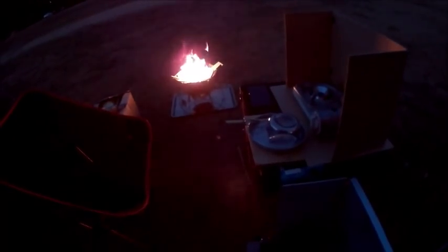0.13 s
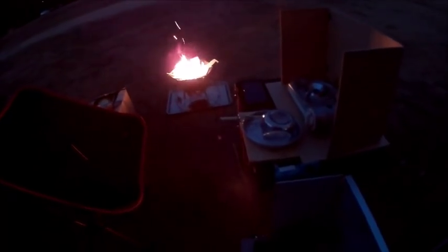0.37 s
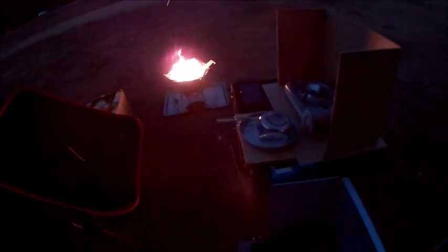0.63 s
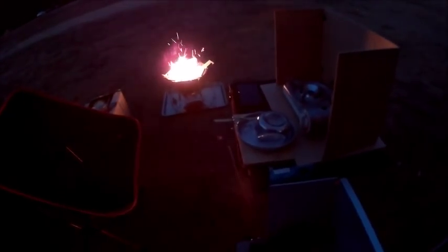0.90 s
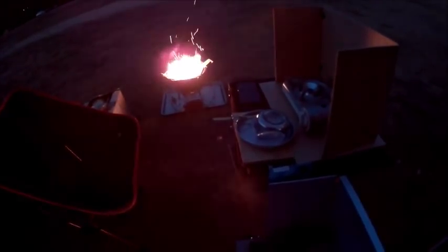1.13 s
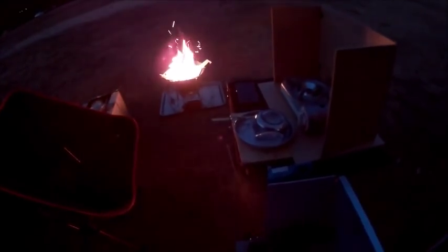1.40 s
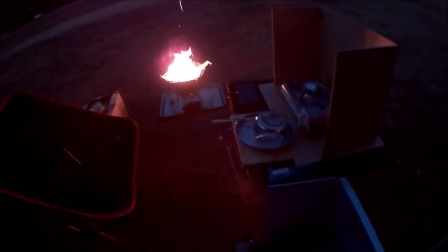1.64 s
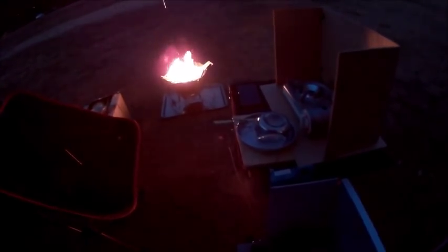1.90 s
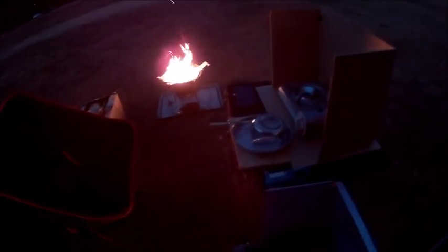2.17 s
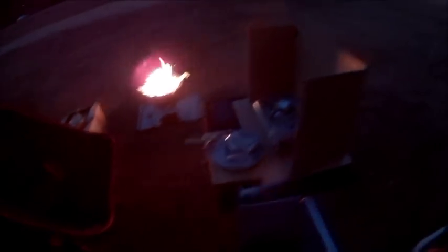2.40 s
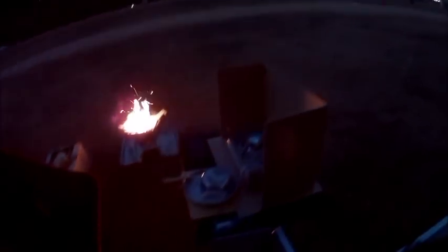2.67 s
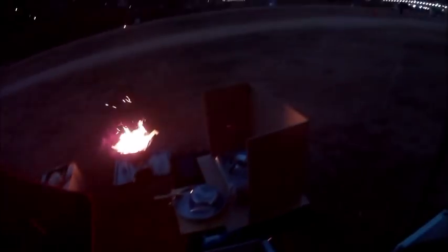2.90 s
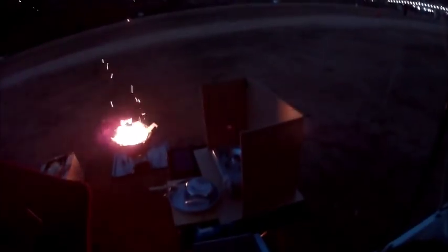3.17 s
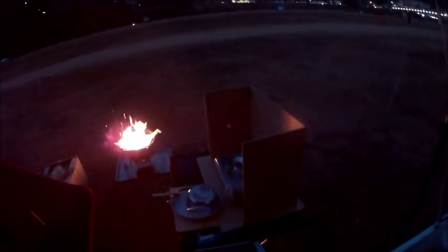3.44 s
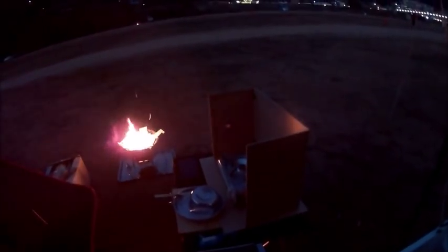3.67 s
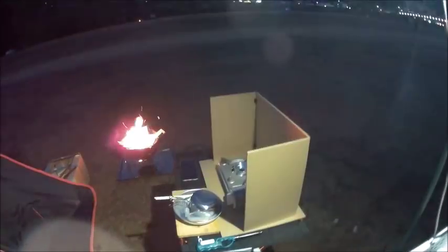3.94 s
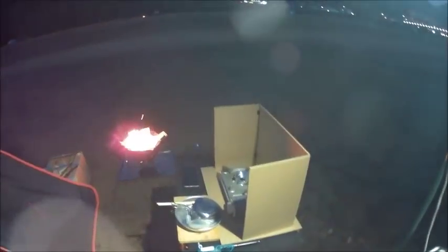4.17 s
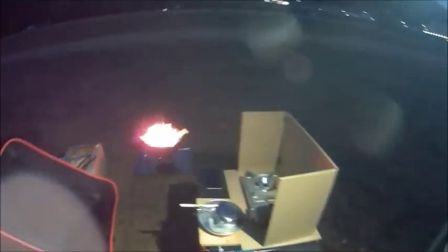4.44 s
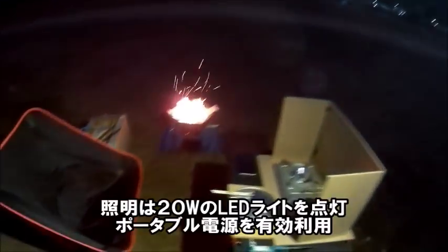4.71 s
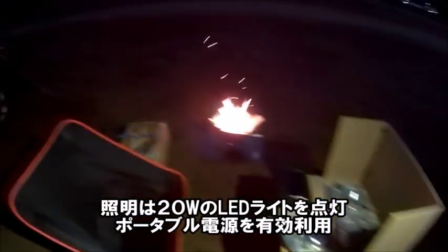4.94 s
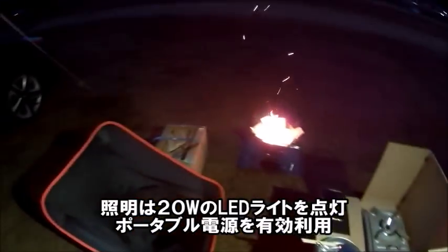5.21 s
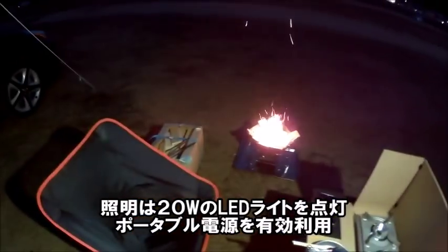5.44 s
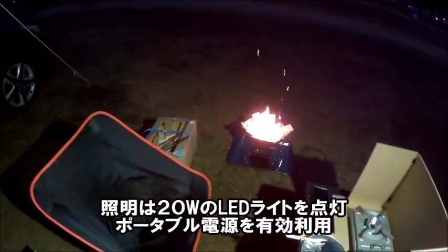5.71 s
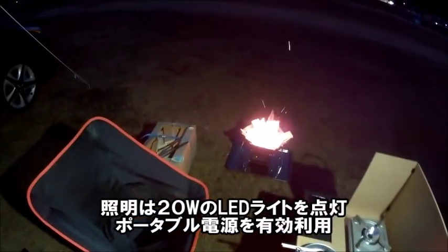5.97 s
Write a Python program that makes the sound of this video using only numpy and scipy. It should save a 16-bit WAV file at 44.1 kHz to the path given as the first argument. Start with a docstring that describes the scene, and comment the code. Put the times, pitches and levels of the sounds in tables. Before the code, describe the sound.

A small wood fire snaps and pops irregularly at night, sharp cracks echoing off nearby gear over a faint low flutter and quiet outdoor air.

```python
"""A night campsite with a small wood fire, a few steps from a hand-held camera.
Pockets of sap burst in the logs: each pop is a set of fast-dying tones, with a ring from the fire pan,
echoes off the gear nearby, a scattered tail of noise and an answer from a far wall.
Tiny crackles, soft puffs of noise, dull knocks and low thumps lie on shaped noise: the flames' rumble,
steam, the night air and microphone hiss. A distant machine hums on two low tones."""
import sys
import numpy as np
from scipy import signal
from scipy.fft import rfft, irfft, next_fast_len
from scipy.io import wavfile
from scipy.ndimage import uniform_filter1d, minimum_filter1d, map_coordinates

SR = 44100
rng = np.random.default_rng(int(sys.argv[2]) if len(sys.argv) > 2 else 0)


def natural_amplitude(level_db):
    """Convert a level in decibels to a linear amplitude factor, elementwise."""
    exponent = np.asarray(level_db, float) / 20
    return 10 ** exponent


def store_wav(level_fs):
    """Save 16-bit WAV to argv[1]."""
    pcm = np.round(np.clip(np.atleast_2d(level_fs), -1, 1) * 32767)
    wavfile.write(sys.argv[1], SR, pcm.T.astype(np.int16))


N = 268569  # length in samples

# How strong the night air and the steam are over time: (t/s, air level/dB, steam level/dB)
AIR_AND_STEAM = [(0.0, -58, -86.5), (1.322, -58, -82.5), (1.91, -59.5, -83.5), (3.21, -56.5, -73.5),
                 (3.7, -58, -86.5), (4.25, -56.5, -72.5), (4.8, -55.5, -71.5), (5.201, -57, -76),
                 (5.63, -57.5, -83), (6.09, -58, -76.5)]


def unit(x):
    """Scale a sound to an average strength (rms) of 1."""
    return x / np.sqrt(np.mean(x ** 2) + 1e-20)


def along(points, hz):
    """Read a curve of (f/Hz, value) points, with frequency on a log axis."""
    f, value = np.transpose(points)
    return np.interp(np.log(hz + 1), np.log(f + 1), value)


def wobble(rate):
    """A smooth random curve through `rate` random points a second."""
    points = rng.standard_normal(int(N * rate / SR) + 4)
    return map_coordinates(points, [np.arange(N) * rate / SR])


def noise(spectrum, size):
    """Random noise of rms 1, its colour set by (f/Hz, level/dB) points."""
    m = next_fast_len(size)
    colour = natural_amplitude(along(spectrum, np.fft.rfftfreq(m, 1 / SR)))
    white = rng.standard_normal(m)
    return unit(irfft(rfft(white) * colour, m)[:size])


def ring(modes, t, spread_db=0, attack=.0001):
    """A struck thing rings: dying tones (f/Hz, level/dB, t60/s) start at t = 0, slightly different each time."""
    detune = .02  # random share by which each pitch is off
    t = np.clip(t, 0, None)
    total = 0
    for hz, db, t60 in modes:
        fade = natural_amplitude(db + spread_db * rng.normal() - 60 * t / t60)  # 60 dB down after t60
        total = total + fade * np.sin(2 * np.pi * hz * (1 + detune * rng.normal()) * t)
    return (1 - np.exp(-t / attack)) * total


def add(track, s, sound):
    """Mix a sound into a track at s seconds."""
    track[round(s * SR):][:len(sound)] += sound


def pops():
    """The bursts loud enough to point at: so small a pocket radiates little bass, but the ground thumps faintly."""
    # Bursts: (t/s, level/dB, pan ring gain/dB, near echo gain/dB, brightness/dB per octave,
    # gain of the last near echo and the scattered tail/dB)
    bursts = [(0.0264, -49, -1, -15, 4, -1), (0.1254, -36, 4, 7, -18, 2.5), (0.2124, -48, 4, -17, 1, -1),
              (0.235, -46, -15.5, -19, 3, -2), (0.392, -56, -15, -9, 5, -5), (0.55, -49.5, -14, -2, 3, -6),
              (0.582, -55, -13, -1, 9, -9), (0.6843, -13, -10, 3, -3, -2), (0.842, -35, -9, 3, 11, -2),
              (0.9997, -11.5, -12, 4, 0, -0.5), (1.0744, -15, -3, 5, -2.5, 2.5),
              (1.1037, -20, 2, -2, -5, -2.5), (1.5927, -53.5, -16, -19, -5, -1),
              (1.8031, -34.5, 2.5, -5, 2, 4), (1.8123, -29.5, -5, -13, 7, -5),
              (1.8469, -41.5, 12, -11, -11, 0), (2.1168, -44, 12, -13, -14.5, 0),
              (2.5095, -16, -9.5, -0.5, 11, -3), (2.5186, -24, 1, 2.5, -1, 3),
              (2.6263, -34.5, -5, -9, 6.5, -5.5), (2.7351, -49.5, -12, -3, 5.5, -3),
              (2.9261, -17, -4, -0.5, 9, 1.5), (2.937, -6, -6, 5, 2, -4),
              (2.9705, -17.5, -12, 1, 2.5, -4.5), (3.2108, -28.5, -11, 7.5, 6.5, -2.5),
              (3.356, -43, 2, 4, 1, 0), (3.4542, -47, -16, 7, 6, 3.5), (3.5033, -10.5, -10, -2.5, 13, -7),
              (3.6998, -35, -11, 12, -11, 3.5), (3.7374, -50, -13, -2, 5, 1), (3.7917, -40, -3, 0, 9, -1.5),
              (3.9044, -20, -0.5, 0.5, 5.5, -3.5), (4.0264, -26.5, 1.5, 2, 1.5, -3),
              (4.5075, -20.5, 0.5, -7.5, -6, 0), (4.6148, -55, 20, -17, -14, -2),
              (4.712, -43, 5, 4, -1.5, 2), (4.7507, -40, -19, -7, 5, -4), (4.9314, -53, -16, -8, 6.5, -1.5),
              (5.152, -47, 12.5, -3, -9, -2), (5.2686, -17, -22, -10.5, -4, -4),
              (5.609, -50.5, -2, -8, 3, -3.5), (5.87, -21.5, -5, -16, -8, -0.5)]
    # The ground's dull answer to a burst: (f/Hz, level/dB, t60/s)
    thump = [(237, -31.5, 0.03)]
    out, low = np.zeros(N + SR), np.zeros(N + SR)
    t = np.arange(SR // 10) / SR
    for s, db, *shape in bursts:
        add(out, s, natural_amplitude(db) * pop(s, *shape))
        add(low, s, natural_amplitude(db) * ring(thump, t, spread_db=2.5, attack=0.00027))
    little_bass = signal.butter(3, 680, "high", fs=SR, output="sos")
    return signal.sosfilt(little_bass, out[:N]) + low[:N]


def pop(s, pan_db, echo_db, tilt_db, wet_db):
    """One burst: a pressure front and ringing snap, then the pan, near echoes, scattered tail and far wall."""
    # The snap at the microphone, before brightness changes it: (f/Hz, level/dB, t60/s)
    snap_tones = [(1760, -12.5, 0.007), (2310, -5, 0.0039), (3650, -5, 0.0034), (5790, -4, 0.0036),
                  (7713, -15, 0.004), (10400, -7.5, 0.0027), (14500, -23.5, .002)]
    # Ring of the fire pan: (f/Hz, level/dB, t60/s)
    pan_tones = [(1310, -4.5, 0.026), (750, -14.5, 0.011)]
    # Echoes off the gear nearby: (multiple of the first delay, level/dB)
    bounces = [(1, 0), (1.42, -4), (2.25, -7)]
    # Colour of those echoes: (f/Hz, level/dB, t60/s)
    bounce_tones = [(1884, -17.5, 0.0027), (3980, -2.5, 0.0067), (4410, -5.5, 0.0075)]
    # The camera moves, and the echoes with it: (t/s, near echo delay/ms, far wall delay/ms)
    camera = [(1.2, 3.7, 40.5), (2.55, 3.15, 40), (3.2, 3.15, 34), (3.75, 2.75, 34), (4.0, 3.35, 34),
              (4.6, 3.3, 40.5), (5.3, 4.2, 40.5), (5.9, 4.05, 41)]
    # Strength of the far wall's answer: (t/s, level/dB)
    far_level = [(1.1, -21), (2.55, -16), (3.0, -46), (3.7, -21.5), (4.05, -19), (4.6, -17), (5.3, -27.5)]
    # First arrival from the far wall: (f/Hz, level/dB, t60/s)
    far_tick = [(2020, -6.5, .018), (2560, 0.5, 0.008), (4273, -6, .008)]
    # Colour of the far wall's noisy wash: (f/Hz, level/dB)
    far_colour = [(300, -120), (500, -20.5), (1200, 2), (2400, -9), (4000, -16), (7000, -15.5),
                  (10000, -120)]

    t = np.arange(SR // 6) / SR
    times, *delays = np.transpose(camera)
    echo_ms, far_ms = (np.interp(s, times, d) for d in delays)
    far_db = np.interp(s, *np.transpose(far_level))

    # The pressure front is a single swing of air
    blast_db, blast_hz = -11.5, 2650
    blast = natural_amplitude(blast_db) * np.sin(2 * np.pi * np.clip(blast_hz * t, 0, 1))
    length = 1.15 * np.exp(-0.038 * tilt_db)  # brighter snaps die sooner
    snap = [(hz, db + tilt_db * np.log2(hz / 3500), t60 * length) for hz, db, t60 in snap_tones]
    pan = natural_amplitude(pan_db) * ring(pan_tones, t, spread_db=2.5)
    direct = blast + ring(snap, t, spread_db=1.5, attack=.00005) + pan

    echoes = []
    for multiple, db in bounces:
        after = t - multiple * echo_ms / 1000
        echoes.append(natural_amplitude(db) * ring(bounce_tones, after, spread_db=3.0, attack=0.00021))
    last_echo_db, scatter_db = 3, -2.5
    near = natural_amplitude(echo_db) * (echoes[0] + echoes[1]) + natural_amplitude(last_echo_db + wet_db) * echoes[2]

    swell = 1 - np.exp(-(t / .0025) ** 2)
    tail = natural_amplitude(scatter_db + wet_db) * scatter(len(t), .3 * tilt_db) * swell

    late = np.clip(t - far_ms / 1000, 0, None)  # time since the far wall answered
    wash = natural_amplitude(-14 - 60 * late / 0.11) * (1 - np.exp(-late / 0.0012)) * noise(far_colour, len(t))
    far = natural_amplitude(far_db) * (ring(far_tick, late, spread_db=2.5, attack=.0003) + wash)
    return direct + near + tail + far


def scatter(size, tilt_db):
    """Sound scattered all around: noise whose every frequency dies at its own speed, in small separate lumps."""
    # Colour of the scattered sound: (f/Hz, level/dB)
    scatter_colour = [(400, -17.5), (1090, -16), (1940, 5), (2480, -4), (3870, 0.5), (6360, -10),
                      (7250, -13.5), (10600, -18.5), (15500, -27)]
    # How long each frequency lasts: (f/Hz, t60/s)
    scatter_t60 = [(700, 0.12), (1850, 0.026), (4880, 0.04), (12000, .06)]
    lumpy_db = 3.5
    hz, t, z = signal.stft(noise(scatter_colour, size), SR, nperseg=128)
    hz = hz[:, None]
    tilt = tilt_db * np.log2(np.clip(hz, 500, 7000) / 3500)
    gain = natural_amplitude(tilt - 60 * t / along(scatter_t60, hz))
    gain += natural_amplitude(-25.5 - 60 * t / 0.18)  # distant ground and trees answer longer
    patches = uniform_filter1d(rng.standard_normal(z.shape), size=8, axis=0)
    lumps = unit(natural_amplitude(lumpy_db * unit(patches)))
    return signal.istft(z * gain * lumps, SR, nperseg=128)[1][:size]


def crackle(count):
    """Tiny bursts at random moments, a few larger than the rest: one small pop repeated at many strengths."""
    when, size = rng.random((count, 2)).T
    strength = natural_amplitude(-4.5 * np.log(size + .02))
    ticks = np.bincount((when * N).astype(int), strength, N)
    small_pop = pop(1.9, pan_db=-14.5, echo_db=-11.5, tilt_db=1.8, wet_db=-5)
    return unit(signal.fftconvolve(ticks, small_pop)[:N])


def knocks_and_thumps():
    """Dull knocks and the low thumps under some bursts: low dying tones with a rough puff of noise."""
    # Knocks and thumps: (t/s, level/dB, f/Hz, t60/s)
    low_hits = [(0.683, -40, 226, 0.04), (0.999, -48, 190, .03), (1.847, -41.5, 487, 0.017),
                (2.119, -42, 587, 0.023), (2.208, -44, 1150, 0.021), (2.229, -44.5, 870, .025),
                (2.512, -34.5, 150, 0.036), (4.511, -35.5, 240, 0.018), (4.5700, -31.5, 740, 0.02)]
    echo_s, echo_db = 0.0032, -14.5  # the ground throws each one back
    out, t = np.zeros(N + SR), np.arange(SR // 8) / SR
    for s, db, hz, t60 in low_hits:
        rough = noise([(hz / 4, -40), (hz, 0), (hz * 2, -3), (hz * 6, -40)], len(t))
        swell = 1 - np.exp(-(t / 0.00055) ** 2)
        puff = natural_amplitude(db - 11.5 - 60 * t / (3 * t60)) * swell * rough
        modes = [(hz, db, t60), (1.2 * hz, db + 6, t60)]
        echo = natural_amplitude(echo_db) * ring(modes, t - echo_s, attack=0.0003)
        add(out, s, ring(modes, t, attack=0.00066) + echo + puff)
    return out[:N]


def soft_puffs():
    """Soft puffs of noise: broad noise broken into grains, swelling and fading, one around a faint pop."""
    # Puffs: (t of the centre/s, level before the swell/dB, half length/s, f of the strongest part/Hz)
    puffs = [(3.179, -64.5, 0.0089, 3860), (3.358, -58.5, 0.024, 4445), (4.585, -51.5, 0.055, 1210),
             (5.151, -52, 0.0155, 1660)]
    out, t = np.zeros(N + SR), np.arange(-SR // 10, SR // 10) / SR
    for s, db, half, hz in puffs:
        broad = noise([(hz / 8, -60), (hz / 4, -16), (hz, 0), (hz * 3, -16), (hz * 8, -50)], len(t))
        grain = natural_amplitude(3 * unit(uniform_filter1d(rng.standard_normal(len(t)), size=60)))
        swell = np.exp(-(t / half) ** 2)
        add(out, s - .1, natural_amplitude(db) * swell * unit(broad * grain))
    return out[:N]


def flames():
    """Flames flutter in the bass: low noise whose strength wanders at random."""
    # Strength of the flames before the flutter: (t/s, level/dB)
    flicker = [(0, -56), (1.2, -56.5), (2.1, -57), (3, -56), (5.2, -57.5), (6.09, -59)]
    # Colour of the rumble: (f/Hz, level/dB)
    rumble = [(8.8, -26.5), (15, 1.5), (38, 0), (70, -4), (103, -4), (146, -5.5), (198, -2), (350, -5),
              (650, -14.5), (1100, -120)]
    flutter_db = 1.2
    level_db = np.interp(np.arange(N) / SR, *np.transpose(flicker))
    return natural_amplitude(level_db + flutter_db * wobble(3.7)) * noise(rumble, N)


def steam():
    """Steam leaves the wood as a quick-trembling hiss, and the wood ticks along at nearly the same level."""
    # Colour of the hiss: (f/Hz, level/dB)
    steam_colour = [(1200, -120), (1800, 6), (3000, -5), (3900, 2.5), (4800, -6.5), (7000, -15.5),
                    (12000, -13.5), (16000, -120)]
    s, _, level_db = np.transpose(AIR_AND_STEAM)
    steam_db = np.interp(np.arange(N) / SR, s, level_db)
    jet = natural_amplitude(steam_db + 1.9 * wobble(36)) * noise(steam_colour, N)
    return jet + natural_amplitude(steam_db - 0.5) * crackle(count=320)


def night_air():
    """The night air: noise mostly in the middle range, its strength drifting at random."""
    # Colour of the air: (f/Hz, level/dB)
    air_colour = [(240, -30.5), (400, -6), (587, -6), (629, -1.5), (824, -1.5), (1190, -4), (1280, -0.5),
                  (1820, -12.5), (3200, -28), (4160, -60.5), (7040, -120)]
    s, level_db, _ = np.transpose(AIR_AND_STEAM)
    air_db = np.interp(np.arange(N) / SR, s, level_db)
    return natural_amplitude(air_db + 0.41 * wobble(2.7) + 0.59 * wobble(2.6)) * noise(air_colour, N)


def machine_hum():
    """A distant machine: low tones that waver in strength and timing."""
    # Tones: (f/Hz, level/dB)
    tones = [(59.5, -69.5), (119, -65.5)]
    t = np.arange(N) / SR
    total = np.zeros(N)
    for hz, db in tones:
        total += natural_amplitude(db + 1.5 * wobble(2.2)) * np.sin(2 * np.pi * hz * t + 2.9 * wobble(5.5))
    return total


def microphone_hiss():
    """The microphone's own faint, steady noise."""
    # Colour of the hiss: (f/Hz, level/dB)
    hiss_colour = [(1500, -14.5), (3000, 0), (7000, -4), (14000, -4.5), (16000, -9)]
    return natural_amplitude(-74.0) * noise(hiss_colour, N)


def scene():
    """Everything adds up at one microphone."""
    fire = pops() + knocks_and_thumps() + soft_puffs() + flames() + steam()
    return (fire + night_air() + machine_hum() + microphone_hiss())[None]


def sudden_frames(x, rise_db, least_db, loud_db):
    """1 in each 32 ms frame of the camera with a sudden or very loud attack, else 0, with soft edges."""
    block = np.floor((np.arange(N) / SR + .0101) / .004).astype(int)  # 4 ms blocks, 8 to a frame
    # The step from sample to sample favours treble
    power = np.bincount(block, np.diff(x, prepend=0) ** 2) / np.bincount(block)
    level = 10 * np.log10(power + 1e-14)
    # Loudest of the six blocks before each one
    before = -minimum_filter1d(-np.pad(level, (6, 0), "edge"), size=6, origin=-3)[:len(level)]
    sudden = (level - before > rise_db) & (level > least_db)
    hit = np.flatnonzero(sudden | (level > loud_db))
    held = np.r_[hit - 1, hit, hit + 1] // 8  # an attack near an edge touches both frames
    between = np.intersect1d(held - 1, held + 1)  # a frame between two such frames joins them
    frames = np.isin(block // 8, np.r_[held, between])
    ends_early = minimum_filter1d(frames * 1., size=150, origin=-74)  # by about 3 ms
    return uniform_filter1d(ends_early, size=60)


def top_cut(x):
    """Nothing passes above the cut-off."""
    return signal.sosfilt(signal.butter(12, 16370, fs=SR, output="sos"), x)


def record(dry):
    """The camera keeps nothing over 15.8 kHz, and fades out treble from 8.5 to 9 kHz up in attack frames."""
    hz = np.fft.rfftfreq(N, 1 / SR)
    wide = irfft(rfft(dry) * (hz < 15800), N)
    treble = irfft(rfft(wide) * np.clip((hz - 8500) / 500, 0, 1), N)
    attacks = sudden_frames(dry[0], rise_db=12, least_db=-51.0, loud_db=-19.5)
    return top_cut(wide - treble * attacks)


dry = scene()
out = record(dry)
store_wav(out)
```